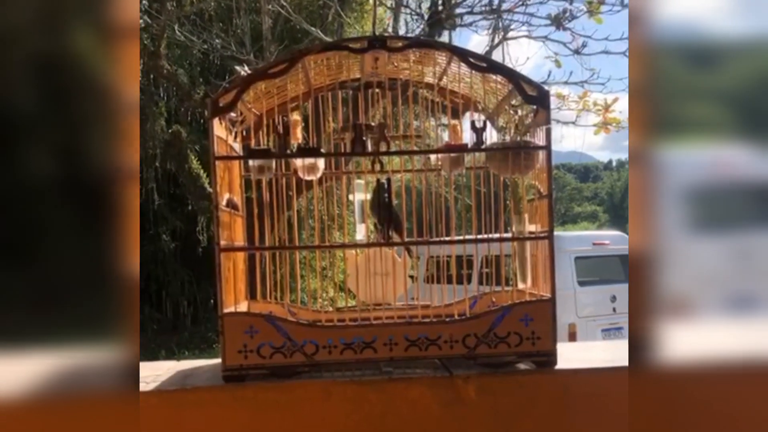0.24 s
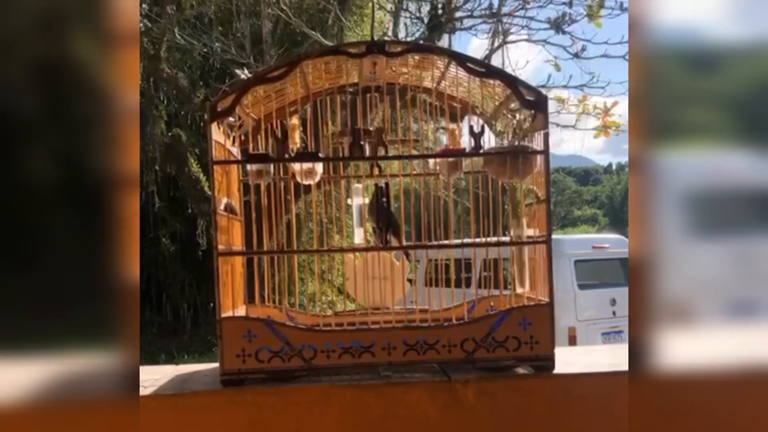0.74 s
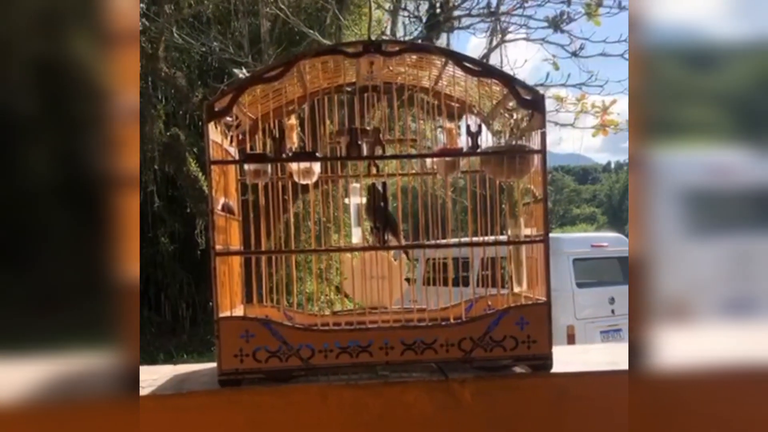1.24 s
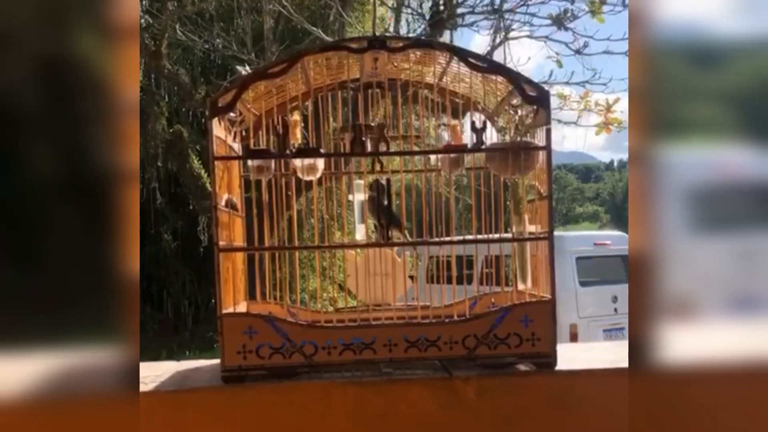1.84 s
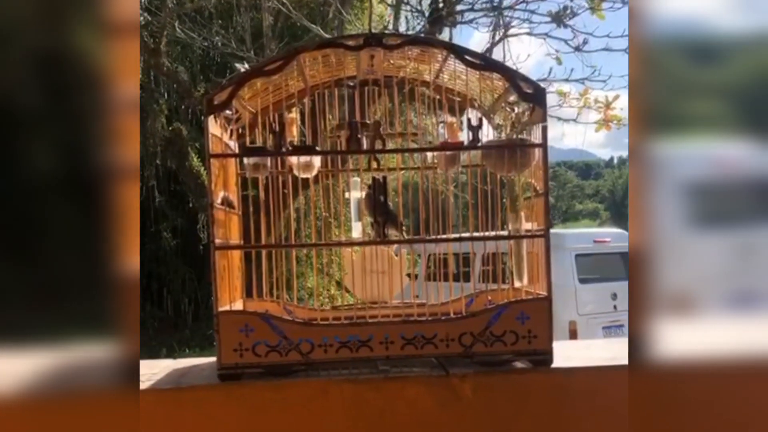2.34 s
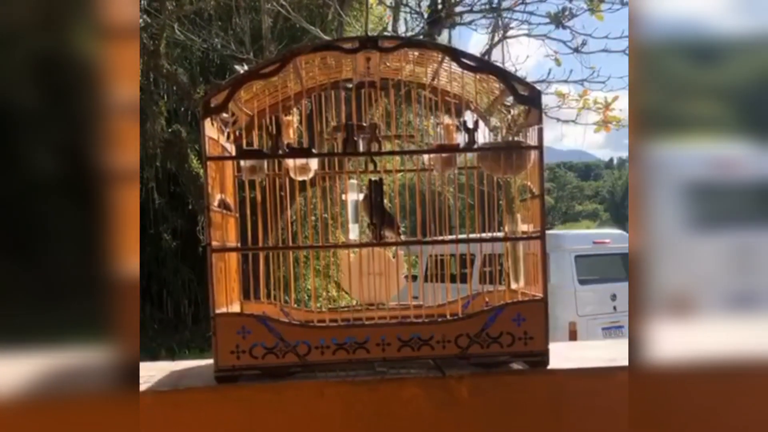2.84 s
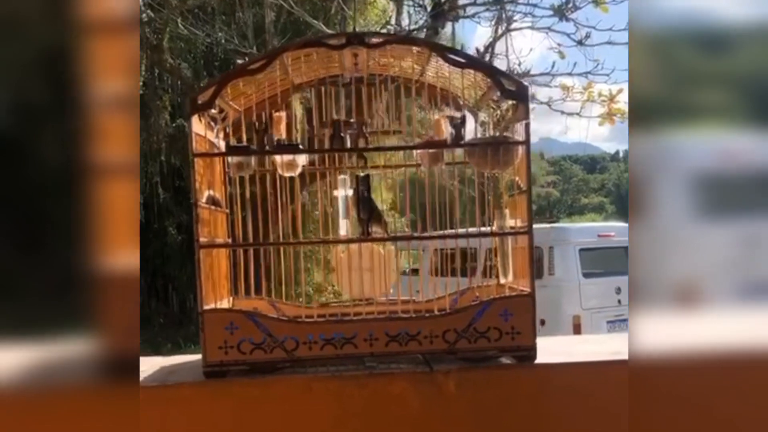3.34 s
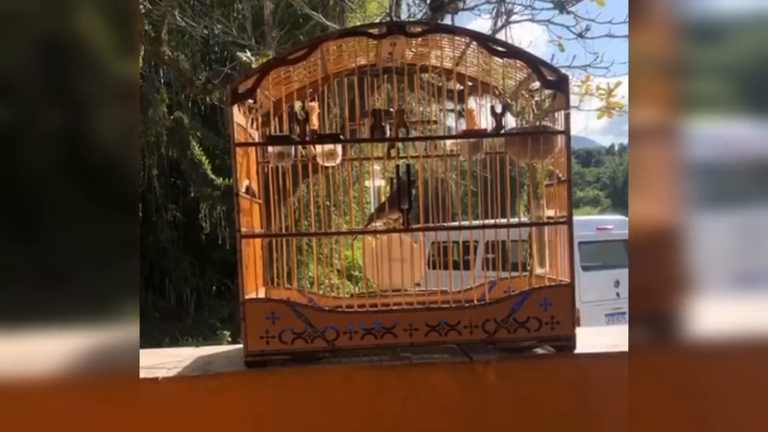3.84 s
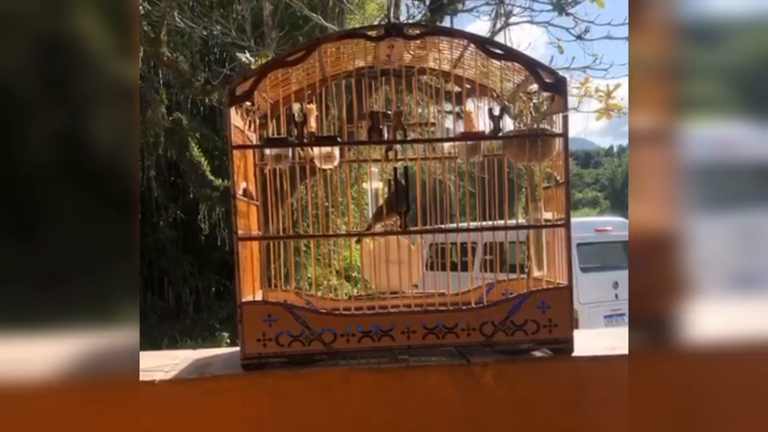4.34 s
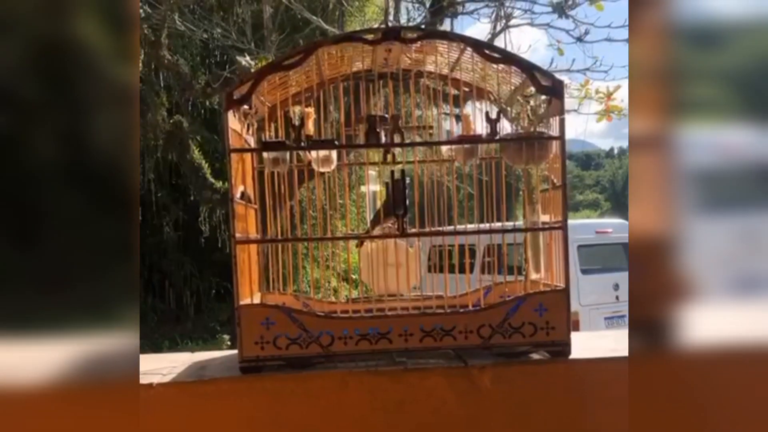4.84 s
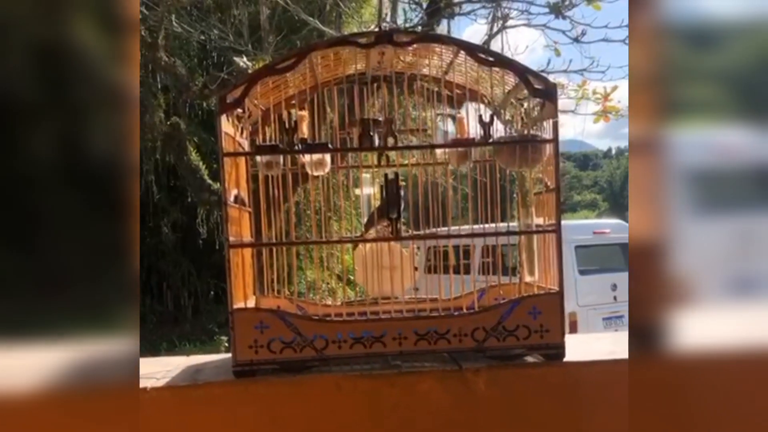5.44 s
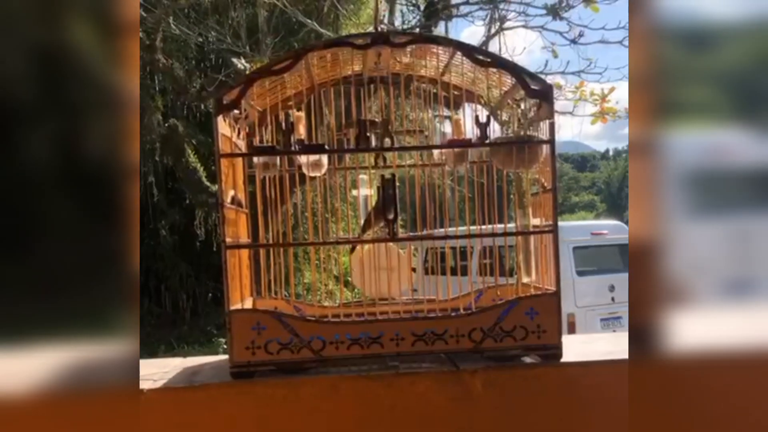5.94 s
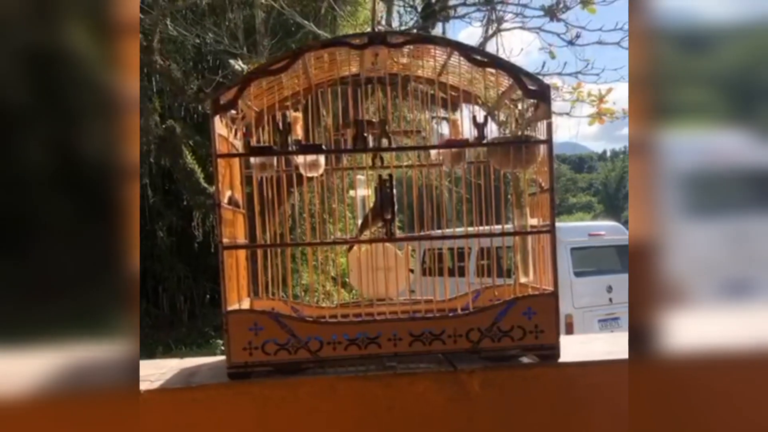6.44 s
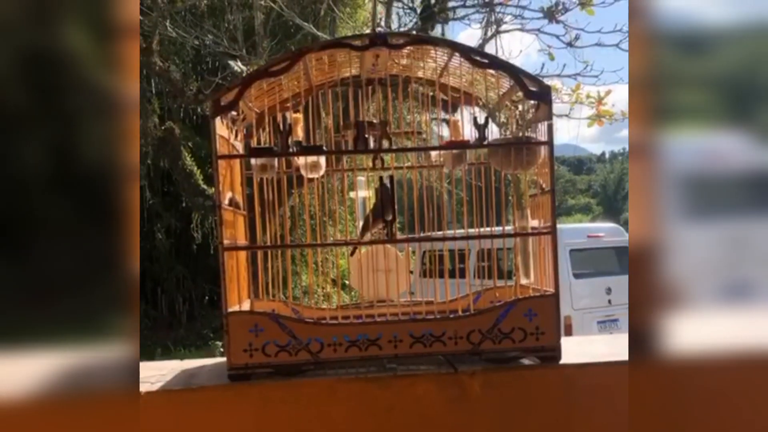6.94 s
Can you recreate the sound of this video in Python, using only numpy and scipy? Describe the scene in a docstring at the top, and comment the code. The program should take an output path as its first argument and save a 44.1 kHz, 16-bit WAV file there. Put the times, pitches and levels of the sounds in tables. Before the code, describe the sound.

A quiet outdoor bed of soft leaf hiss, low traffic rumble and a barely audible wavering insect tone; faint distant birds whistle at 0.2-1.1 s. At 1.4 s a close small bird begins softly with a slurred whistle, then three louder rising whistles around 3-4 kHz until 2.3 s, then four sharp, slightly buzzy chirps sweeping from about 9 down to 3 kHz, ending near 3.2 s. Notes come four or five per second with short porch echoes. Dull air puffs thump the microphone at 2.0-2.3 s and harder at 3.2-3.4 s. Sound drops to near silence from 3.56 to 3.71 s. A low drone swells around 4 s. A tiny chip at 4.5 s opens the second phrase: soft slur, three rises, a buzz at 5.5 s, a glide, a churr, a tiny cage tick at 6.07 s, and three falling chirps until 6.65 s. Faint far whistles close it.

```python
"""A caged seedeater on a porch sings two phrases: gliding whistles with trilled, buzzy pitch, partly two-voiced.
Overtones come from bending the whistle's own wave; random early echoes, a diffuse tail and rings form the porch.
One tick sounds in the cage, far birds whistle, falling thumps with hiss are puffs of air on the microphone.
Behind lie a wavering insect tone, noise for traffic and leaves, and a low drone that swells once.
Between the phrases the sound drops out briefly."""
import sys
import numpy as np
from scipy import signal
from scipy.fft import rfft, irfft, next_fast_len
from scipy.io import wavfile
from scipy.ndimage import uniform_filter1d, map_coordinates

SR = 44100
rng = np.random.default_rng(int(sys.argv[2]) if len(sys.argv) > 2 else 0)


def transcribe(signal):
    """Save signal, clipped to [-1, 1], as a 16-bit WAV file at the path in sys.argv[1]."""
    frames = np.atleast_2d(signal).T
    limited = np.clip(frames, -1, 1)
    pcm = np.round(limited * 32767).astype(np.int16)
    wavfile.write(sys.argv[1], SR, pcm)


N = 316638
T = np.arange(N) / SR

# Gestures of the syrinx, one syllable per table; overlapping rows sound both its sides.
# Nominal values, before the song's length, pitch and level:
# (delay [s], length [s], start [Hz], end [Hz], glide time [s], glide bend [exponent], level [dB],
#  starting strength [0-1], attack [s], release [s], trill depth [Hz], trill life [s], trill rate [Hz])
SLUR = [(0, .092, 2880, 3773, 0.034, 1.5, -4, 0.03, 0.063, 0.016, 200, .055, 134.3),
        (.08, 0.072, 3825, 4017, 0.02, 1.1, 0, 0.51, 0.037, .012, 15, .05, 160)]
# Same columns
RISE = [(0, .082, 3120, 3461, 0.067, 4, -11, 0.098, 0.065, 0.015, 240, 0.12, 141.7),
        (.07, 0.11, 3580, 4319, .052, 2.1, -1.5, 0.35, .095, .008, 54.35, .05, 142)]
# Same columns
SWEEP = [(0, 0.054, 9050, 6890, 0.022, 2.3, -1.5, .14, 0.032, 0.024, 56, .15, 190),
         (.04, 0.045, 6834, 5730, 0.021, 1.3, 2.5, .35, .028, 0.015, 50, .15, 189.5),
         (.076, .015, 4350, 5204, .008, 1.5, -8.5, .3, .008, .004, 50, .05, 170),
         (.082, 0.053, 5740, 4498, .032, 1.6, -3, 0.13, .01, 0.037, 270, .15, 190.2),
         (.087, .04, 5150, 3900, .028, 1.7, -2, .1, .008, 0.04, 330, .06, 170),
         (.124, 0.033, 3780, 2590, 0.025, 2.2, -4, 0.22, .008, 0.034, 20, .05, 169.5)]
# Same columns
BUZZ = [(0, 0.12, 5915, 5030, .06, 2, 4.6, .07, 0.022, 0.043, 570, 0.055, 206.7),
        (.096, .049, 5090, 4790, 0.012, 1.2, 5.8, .2, 0.029, 0.011, 120, 0.02, 212.7)]
# Same columns
GLIDE = [(0.00067, 0.12, 8660, 5700, 0.036, 1.1, 1, .08, 0.03, 0.0037, 43, 0.15, 190)]
# Same columns
CHURR = [(0, 0.092, 4273, 3644, .084, 4.1, -3, .09, 0.056, 0.02, 380, .068, 151.1),
         (.079, 0.029, 3440, 3146, 0.0168, 1.5, -14.5, 0.22, 0.011, 0.0092, 293.5, .08, 140.5)]
# Same columns
CHIP = [(0.00086, 0.015, 6600, 8650, 0.0072, 1.5, 0.0028, 0.45, 0.0045, 0.0096, 410, .05, 200)]
# Syllable name: gesture table
SYLLABLES = {"slur": SLUR, "rise": RISE, "sweep": SWEEP, "buzz": BUZZ, "glide": GLIDE, "churr": CHURR,
             "chip": CHIP}
# Song: (onset [s], level [dB], length [factor], pitch [factor], syllable [name])
SONG = [(1.435, -37.5, 1.016, 0.99, "slur"), (1.716, -25, 1.004, 1.002, "rise"),
        (1.968, -22, 1.006, 1.006, "rise"), (2.189, -21.5, 1.01, 0.995, "rise"),
        (2.421, -22, 0.96, 0.99, "sweep"), (2.618, -22, 1.026, 1.003, "sweep"),
        (2.83, -22.5, 1.04, 0.99, "sweep"), (3.042, -22, 1.048, 1, "sweep"),
        (4.48, -59.5, 1.0, 1.0, "chip"), (4.571, -40, 0.98, 0.99, "slur"), (4.854, -26, 0.94, 1, "rise"),
        (5.097, -23.5, 0.94, 0.99, "rise"), (5.322, -21.5, 0.98, 0.99, "rise"),
        (5.542, -28.5, 1.0, 1.0, "buzz"), (5.736, -25, 0.97, 1.035, "glide"),
        (5.894, -22.5, 0.98, 1.005, "churr"), (6.058, -23, 1.026, 0.985, "sweep"),
        (6.26, -24, 1.033, 0.98, "sweep"), (6.492, -25.5, 1.068, 0.96, "sweep")]
# Overtone strength leaving the beak: (frequency [Hz], gain [dB])
OVERTONE_COLOUR = [(1000, -23), (3000, -12.5), (6000, -1.5), (8500, 0.5), (10500, 2), (11900, -4),
                   (12500, -18), (13200, -51)]
# Porch tail decay: (frequency [Hz], t60 [s])
PORCH_DECAY = [(2000, 0.16), (4000, 0.32), (6000, 0.26), (9000, .3), (13000, 0.062)]
# Pitches at which cage and porch ring on: (frequency [Hz], gain [dB], t60 [s])
RINGS = [(3150, -3, .35), (3780, 1.5, .45), (6240, -5, 0.34)]
# Far calls, level before the direct/wet mix: (time [s], length [s], start [Hz], end [Hz], level [dB])
FAR_CALLS = [(0.254, 0.13, 2088, 2060, -60.5), (0.244, 0.12, 717, 720, -64),
             (0.509, 0.16, 2102, 2066, -61.5), (.94, 0.25, 1940, 1820, -70),
             (6.402, 0.18, 2490, 2094, -60.5), (6.699, 0.23, 1730, 2400, -63.5),
             (6.916, 0.27, 3070, 2207, -59)]
# Puffs on the microphone: (time [s], level [dB], start above rest [Hz], pitch fall time [s],
#  thump t60 [s], hiss relative to level [dB])
PUFFS = [(2.001, -31, 220, 0.01, 0.28, -37), (2.123, -36, 234, 0.0059, 0.23, -50),
         (2.224, -34.5, 319, 0.0084, 0.24, -32), (3.206, -30, 454, .01, 0.21, -27),
         (3.222, -20.5, 597, 0.0041, 0.11, -48), (3.358, -36, 1194, .0026, 0.18, -32),
         (3.407, -23, 1070, 0.00282, 0.17, -26.5)]
# Rushes of air, a slow swell and then a snap: (peak time [s], level [dB], rise [s], fall [s])
RUSTLES = [(3.401, -43, 0.021, 0.02), (3.4081, -26, 0.0018, 0.0013)]
# Puff hiss spectrum: (frequency [Hz], relative level [dB])
RUSH_SPECTRUM = [(60, -16.5), (280, -7.5), (480, 2.5), (800, -5.5), (1200, -6.5), (1900, -22.5),
                 (3200, -24), (4500, -46.5), (7000, -88)]
# Traffic rumble spectrum: (frequency [Hz], relative level [dB])
RUMBLE_SPECTRUM = [(12, -29), (20, -9.5), (32, -8), (43, 4), (54, 3.5), (66, 0.5), (85, -11.5), (130, -20),
                   (170, -52.5), (290, -120)]
# Leaf and hiss spectrum: (frequency [Hz], relative level [dB])
OUTDOORS_SPECTRUM = [(53, -25.5), (90, 0.5), (175, -2), (207, -8.5), (244, -3), (363, -8), (447, -8.5),
                     (539, -14), (1730, -25), (2080, -24.5), (2220, -26), (4050, -28.5), (4990, -24.5),
                     (10600, -40.5), (13000, -54)]
# Dropout: (start [s], end [s])
DROPOUT_S = (3.558, 3.714)

TOP_HZ = 12500  # band limit
QUIVER_HZ = 10  # the trill never dies away entirely
RUMBLE_DB, AIR_DB, AIR_GROWS_DB_PER_S = -52, -59.5, 0.36
SURGE_S, SURGE_DB, SURGE_RISE_S, SURGE_FALL_S = 3.97, 14.5, 0.21, 0.53  # swell of the drone


def seedeater():
    """Both sides of the syrinx add up; each note gets its own random porch echo."""
    song, sheen = np.zeros(N), np.zeros(N)
    t = np.arange(SR // 4) / SR
    beak = signal.butter(6, 2450, "highpass", fs=SR, output="sos")
    for onset_s, level_db, length, pitch, name in SONG:
        voices = [syrinx(gesture, t / length, pitch) for gesture in SYLLABLES[name]]
        tone, buzz = np.sum(voices, axis=0)
        add(song, onset_s, amp(level_db) * porch(signal.sosfilt(beak, tone)))
        # overtones beam away from the microphone and arrive mostly off the walls
        upper = overtones(tone, np.minimum(buzz, 1))
        upper = porch(upper, direct_db=-2.5, early_db=-4, tail_db=1.5)
        add(sheen, onset_s, amp(level_db - 1.5) * upper)
    return song + filtered(sheen, lambda hz: amp(along(OVERTONE_COLOUR, hz)))


def syrinx(gesture, t, pitch, wander=.005, jitter=0.002, rough=0.016, flutter_db=1.85, edge_s=0.0013,
           full_trill_hz=350):
    """A whistle swells and glides to its end pitch as its rough trill fades; returns tone and buzz (0-1)."""
    (delay_s, length_s, start_hz, end_hz, glide_s, bend, level_db, first, attack_s, release_s,
     depth_hz, trill_s, trill_hz) = gesture
    t = np.maximum(t - delay_s, 0)
    size = len(t)
    glide_hz = end_hz + (start_hz - end_hz) * np.exp(-(t / glide_s) ** bend)

    depth = QUIVER_HZ + depth_hz * np.exp(-(t / trill_s) ** 2)
    buzz = np.clip(depth / full_trill_hz, 0, 1)
    trill_rate_hz = trill_hz * (1 + .05 * wobble(60, size))
    trill = sine(trill_rate_hz)

    unsteady = 1 + wander * wobble(45, size) + (jitter + rough * buzz) * wobble(900, size)
    hz = pitch * glide_hz * unsteady + depth * trill

    gate = np.clip(np.minimum(t / edge_s, (length_s - t) / release_s), 0, 1)
    pressure = gate * np.minimum(first + (1 - first) * t / attack_s, 1)
    level = pressure * amp(level_db + flutter_db * wobble(150, size))
    return np.sqrt(2) * level * sine(hz), buzz * gate


def overtones(tone, buzz, second_db=-33, third_db=-36, rasp_db=-45, buzz_db=6, scatter_rad=0.1, growth=.8):
    """The syrinx bends its own wave into overtones and sum tones; trilled parts are harsher and raspy."""
    whirl = signal.resample_poly(signal.hilbert(tone), 2, 1)  # double rate: room for overtones
    size = np.abs(whirl)
    phase = np.angle(whirl) + scatter_rad * wobble(1400, len(whirl))  # 2800 knots/s at double rate
    upper = amp(second_db) * np.cos(2 * phase) + amp(third_db) * np.cos(3 * phase)
    bent = signal.resample_poly(size ** growth * upper, 1, 2)
    rasp = amp(rasp_db) * np.sqrt(size[::2]) * buzz * rng.standard_normal(len(tone))
    return amp(buzz_db * buzz) * (bent + rasp)


def porch(note, direct_db=0, early_db=-4, tail_db=-6.5, early_s=0.031):
    """Near walls return a few strong copies, then a diffuse tail in which a few pitches linger."""
    echo = amp(tail_db) * tail(PORCH_DECAY)
    t = np.arange(len(echo)) / SR
    for hz, gain_db, t60_s in RINGS:
        fade = np.log(1000) / t60_s
        ring = np.exp(-fade * t) * np.sin(2 * np.pi * hz * t)
        echo += amp(gain_db) * 2 * fade / SR * ring
    echo[:SR // 250] = 0  # tail and rings start after 4 ms

    delay = rng.uniform(.1, 1, size=7)  # share of early_s
    strength = rng.standard_normal(size=7) * np.exp(-delay)
    strength *= amp(early_db) / np.linalg.norm(strength)
    echo += np.bincount((delay * early_s * SR).astype(int), strength, len(echo))
    echo[0] = amp(direct_db)
    return signal.fftconvolve(note, echo)


def tail(decays):
    """A diffuse echo of energy 1; each frequency dies at its own speed."""
    hz, t, z = signal.stft(rng.standard_normal(SR), SR, nperseg=256)
    fade_db = -60 * t / along(decays, hz)[:, None]
    echo = signal.istft(z * amp(fade_db), SR, nperseg=256)[1]
    return echo / np.linalg.norm(echo)


def tick(at_s=6.072, level_db=-46, t60_s=0.015):
    """One tiny dry tick in the cage: a short noise decay, high-passed."""
    click, t = np.zeros(N), np.arange(SR // 50) / SR
    add(click, at_s, amp(level_db - 60 * t / t60_s) * rng.standard_normal(len(t)))
    return filtered(click, lambda hz: hz ** 2 / (hz ** 2 + 4000 ** 2))


def far_birds(direct=0.65, wet=0.7, waver=0.0114):
    """Swelling whistles, wavering in proportion to their glide, smeared by the wooded hillside."""
    calls = np.zeros(N)
    for onset_s, length_s, start_hz, end_hz, level_db in FAR_CALLS:
        u = np.linspace(0, 1, int(length_s * SR))
        hz = start_hz + (end_hz - start_hz) * (u + 10 * waver * wobble(243.6, len(u)))
        add(calls, onset_s, amp(level_db) * np.abs(np.sin(np.pi * u)) * sine(hz))
    hillside = tail([(1000, 0.44), (4000, 0.42)])  # (frequency [Hz], t60 [s])
    return direct * calls + wet * signal.fftconvolve(calls, hillside)[:N]


def puffs(rest_hz=52, attack_s=0.0056, hiss_t60_s=0.07):
    """Each eddy of air gives a thump that falls quickly in pitch, with a short rush on top."""
    thumps, t = np.zeros(N), np.arange(SR // 4) / SR
    rush = sum(amp(level_db) * swell(peak_s, rise_s, fall_s) for peak_s, level_db, rise_s, fall_s in RUSTLES)
    for onset_s, level_db, start_hz, fall_s, t60_s, hiss_db in PUFFS:
        hz = rest_hz + start_hz * np.exp(-t / fall_s)
        envelope = amp(level_db - 60 * t / t60_s) * (1 - np.exp(-t / attack_s))
        add(thumps, onset_s, envelope * sine(hz))
        add(rush, onset_s, amp(level_db + hiss_db - 60 * t / hiss_t60_s))
    soft = signal.butter(4, 3500, fs=SR, output="sos")  # air carries no sharp edge
    return signal.sosfilt(soft, thumps + rush * noise(RUSH_SPECTRUM))


def insects(level_db=-80.5, centre_hz=5250, drift_hz=170, blur_hz=100):
    """A thin shrill from the trees: one sine, wavering in pitch and level."""
    hz = centre_hz + drift_hz * wobble(2.3, N) + blur_hz * wobble(600, N)
    return amp(level_db + 2.2 * wobble(3.3, N)) * np.sqrt(2) * sine(hz)


def outdoors(drone_db=-4, drone_hz=47, hiss_db=-58.0, drift_db=-0.33, surge_share=0.44):
    """Far traffic rumbles and its drone swells once, under a rush of leaves that slowly grows and a hiss."""
    surge_db = SURGE_DB * swell(SURGE_S, SURGE_RISE_S, SURGE_FALL_S)
    drone = np.sqrt(2) * sine(drone_hz + 2.3 * wobble(4.2, N)) * amp(2.9 * wobble(13, N))
    rumble = amp(surge_share * surge_db) * noise(RUMBLE_SPECTRUM)  # swells less than the drone
    low = rumble + amp(drone_db + surge_db) * drone
    low = amp(RUMBLE_DB + drift_db * wobble(2.9, N)) * low

    air = noise(OUTDOORS_SPECTRUM)
    body = filtered(air, lambda hz: 1 / (1 + (hz / 1300) ** 4))
    leaves = amp(AIR_DB + AIR_GROWS_DB_PER_S * T + wobble(8, N)) * patchy(body)
    return low + leaves + amp(hiss_db) * (air - body)


def patchy(x, depth_db=2.5):
    """Let patches of the spectrum come and go at random."""
    z = signal.stft(x, nperseg=2048)[2]
    field = uniform_filter1d(rng.standard_normal(z.shape), size=3, axis=0)
    field = uniform_filter1d(field, size=8, axis=1)
    y = signal.istft(z * amp(depth_db * unit(field)), nperseg=2048)[1][:N]
    return np.std(x) * unit(y)


def noise(spectrum):
    """Coloured noise of rms 1."""
    return unit(filtered(rng.standard_normal(N), lambda hz: amp(along(spectrum, hz))))


def sine(hz):
    """A sine that follows a frequency track."""
    return np.sin(2 * np.pi * np.cumsum(hz) / SR)


def wobble(rate, size):
    """A smooth random curve, rate knots a second at SR."""
    return map_coordinates(rng.standard_normal(4096), [np.arange(size) * rate / SR], mode="wrap")


def swell(s, rise_s, fall_s):
    """A smooth hump that reaches 1 at time s."""
    return np.exp(-((T - s) / np.where(T < s, rise_s, fall_s)) ** 2)


def filtered(x, response):
    """x times a response of frequency."""
    m = next_fast_len(N + SR // 2)
    return irfft(rfft(x, m) * response(np.fft.rfftfreq(m, 1 / SR)), m)[:N]


def along(points, hz):
    """Interpolate (frequency [Hz], value) points on a log axis."""
    f, v = np.transpose(points)
    return np.interp(np.log(hz + 1), np.log(f + 1), v)


def add(track, s, sound):
    """Mix a sound into the track at time s."""
    part = track[round(s * SR):][:len(sound)]
    part += sound[:len(part)]


def amp(db):
    """Decibels to gain."""
    return 10 ** (np.asarray(db) / 20)


def unit(x):
    """Scale to rms 1."""
    return x / np.sqrt(np.mean(x ** 2) + 1e-20)


def scene():
    """The near bird over its surroundings."""
    return (seedeater() + tick() + far_birds() + puffs() + insects() + outdoors())[None]


def record(dry, dropout_db=-55):
    """The sound drops out once; a steep low-pass sets the band limit."""
    start_s, end_s = DROPOUT_S
    gate = np.where((T > start_s) & (T < end_s), amp(dropout_db), 1.0)
    gate = uniform_filter1d(gate, size=128)  # softens the edges
    return filtered(dry[0] * gate, lambda hz: 1 / np.sqrt(1 + (hz / TOP_HZ) ** 80))[None]


dry = scene()
out = record(dry)
transcribe(out)
```